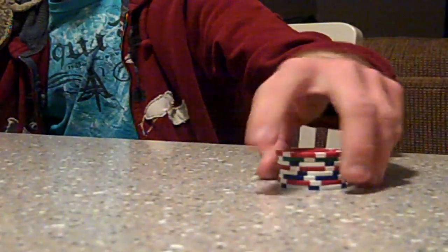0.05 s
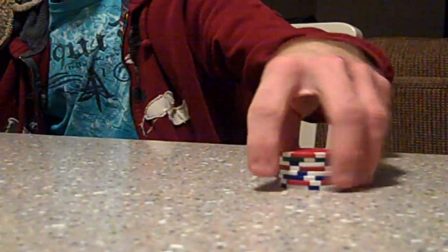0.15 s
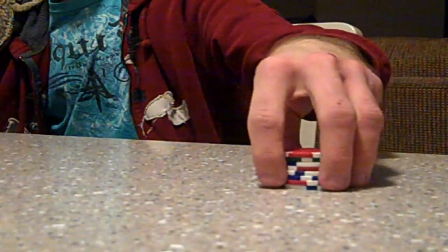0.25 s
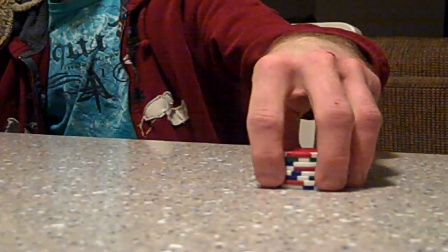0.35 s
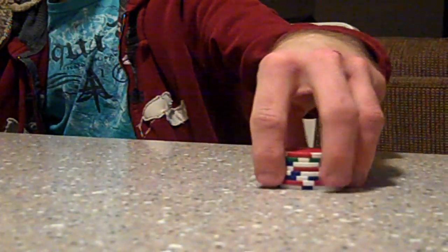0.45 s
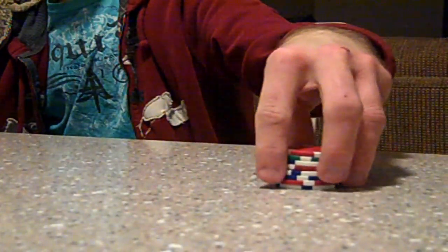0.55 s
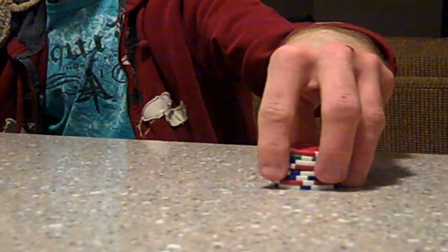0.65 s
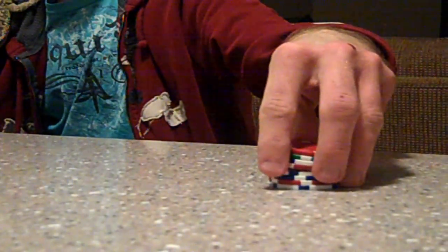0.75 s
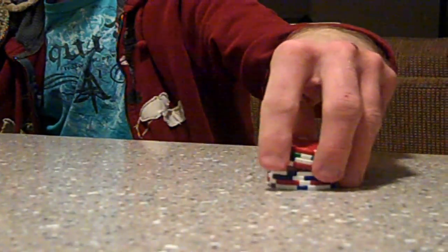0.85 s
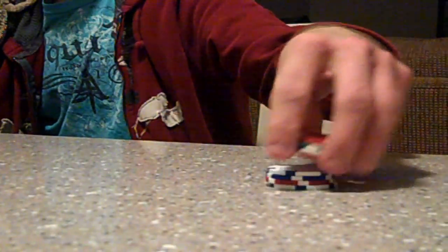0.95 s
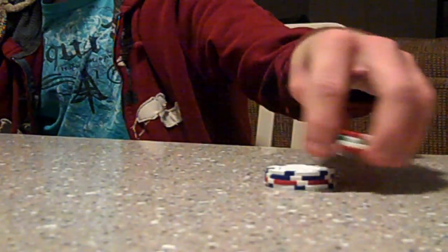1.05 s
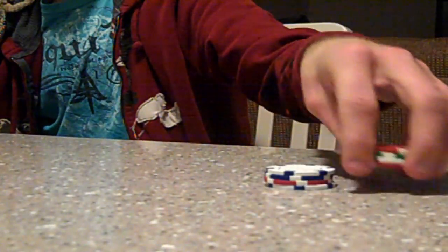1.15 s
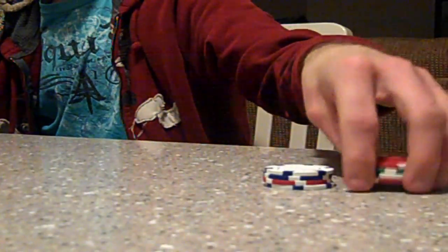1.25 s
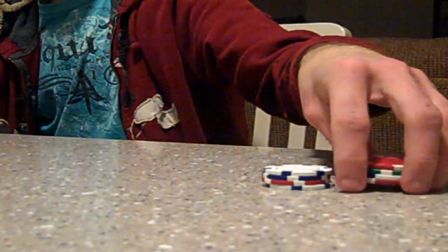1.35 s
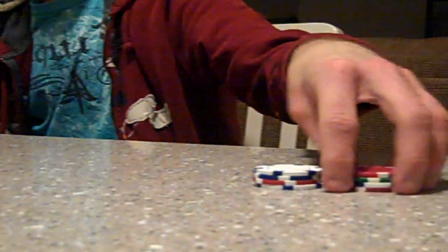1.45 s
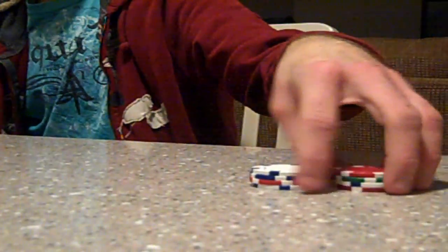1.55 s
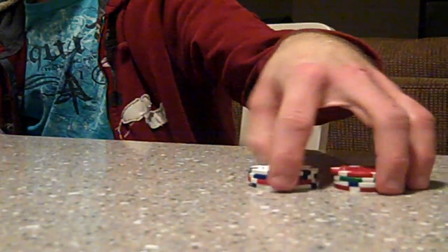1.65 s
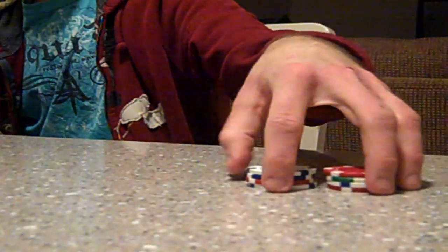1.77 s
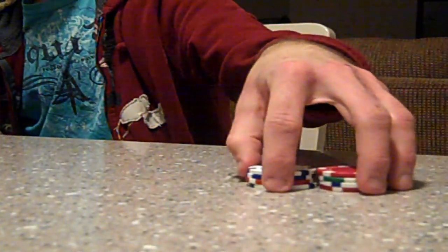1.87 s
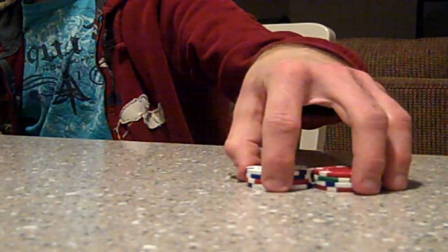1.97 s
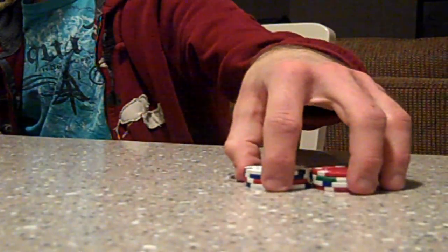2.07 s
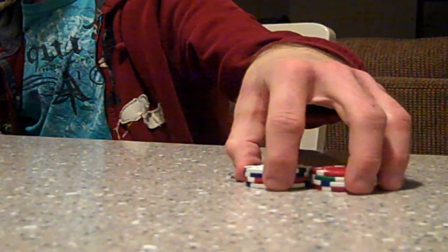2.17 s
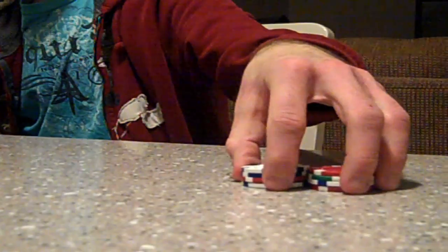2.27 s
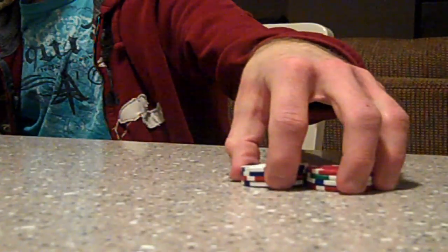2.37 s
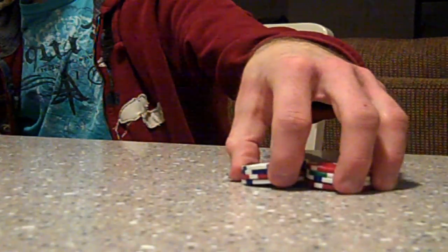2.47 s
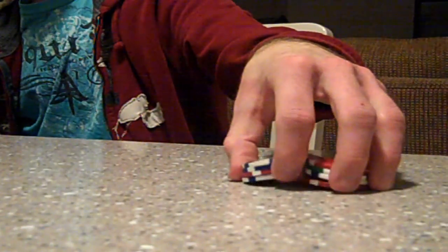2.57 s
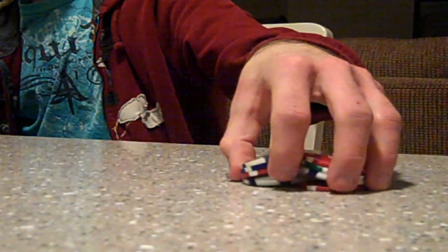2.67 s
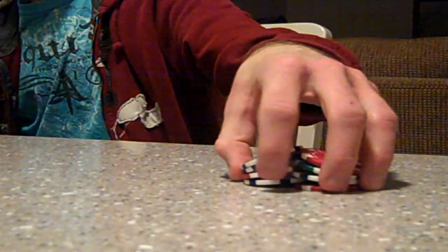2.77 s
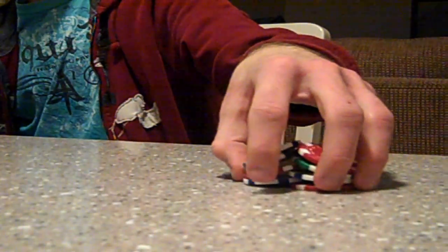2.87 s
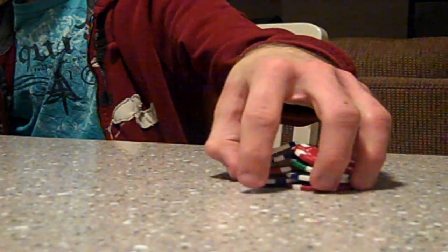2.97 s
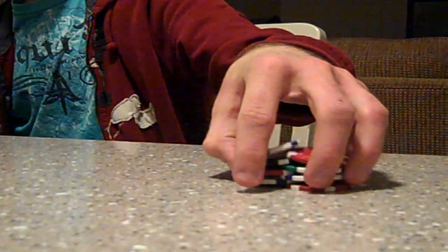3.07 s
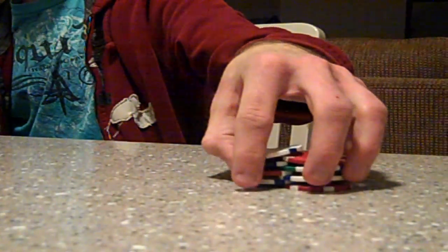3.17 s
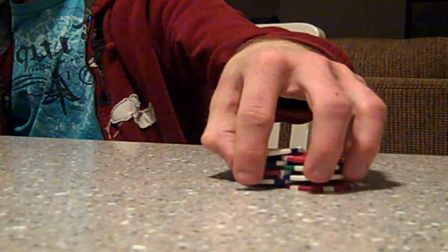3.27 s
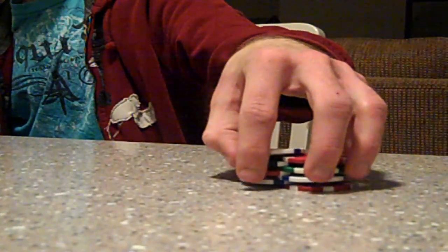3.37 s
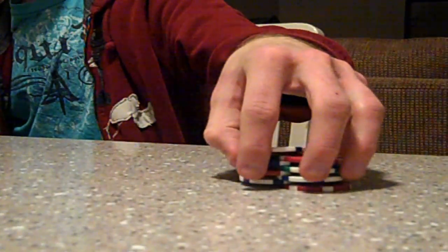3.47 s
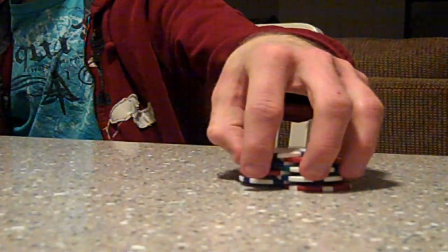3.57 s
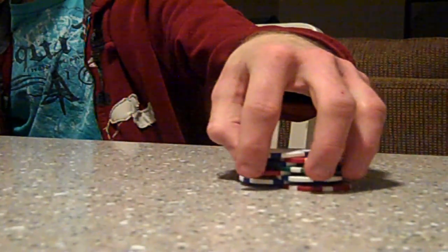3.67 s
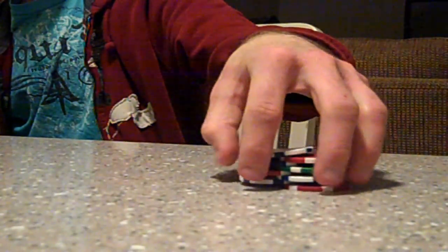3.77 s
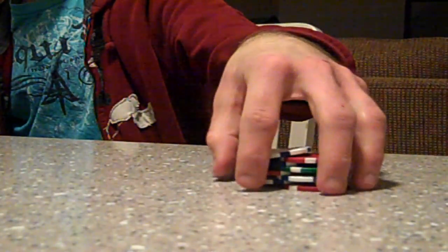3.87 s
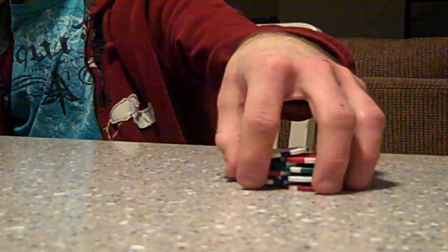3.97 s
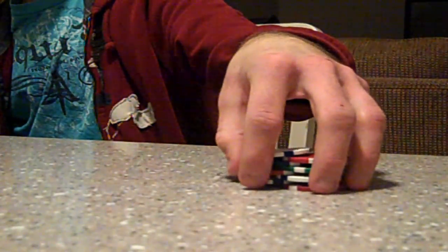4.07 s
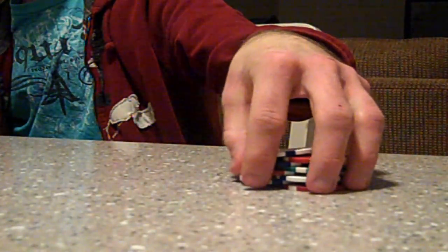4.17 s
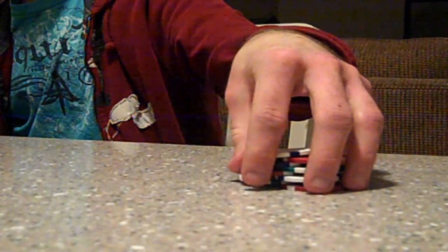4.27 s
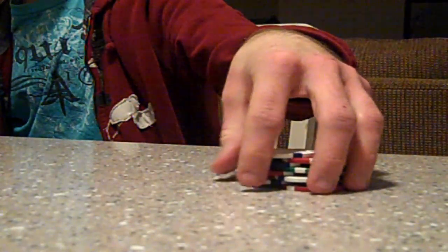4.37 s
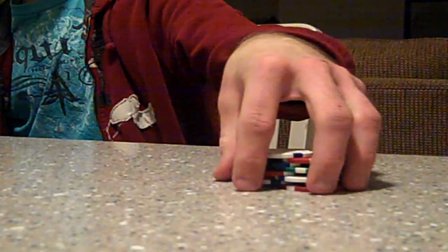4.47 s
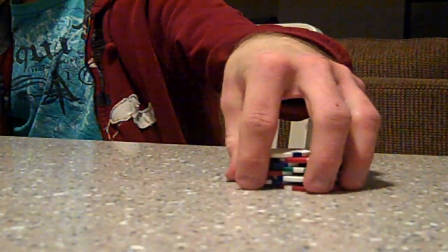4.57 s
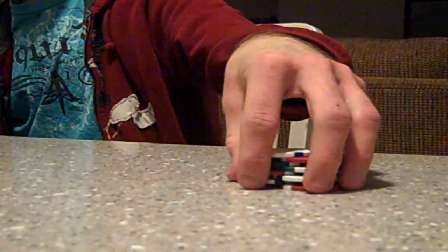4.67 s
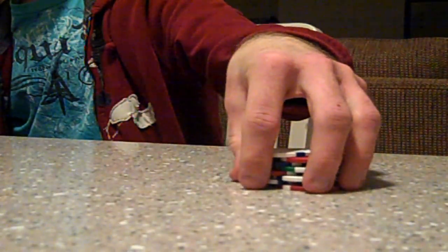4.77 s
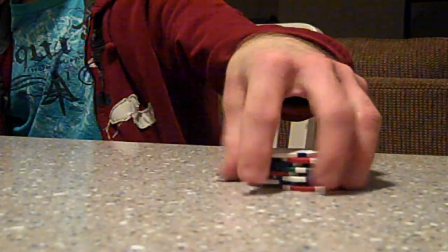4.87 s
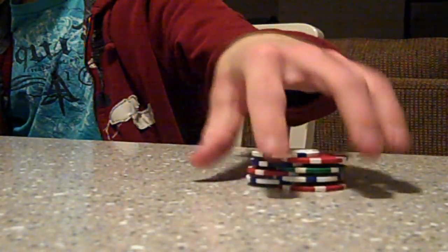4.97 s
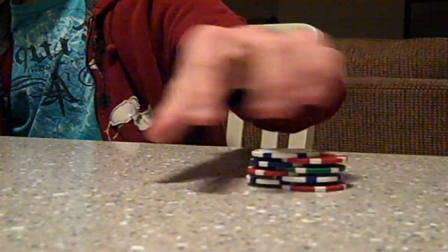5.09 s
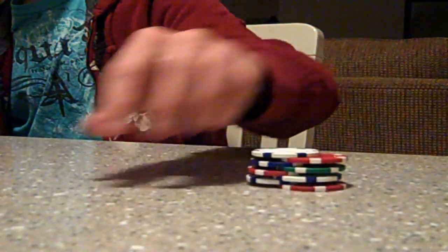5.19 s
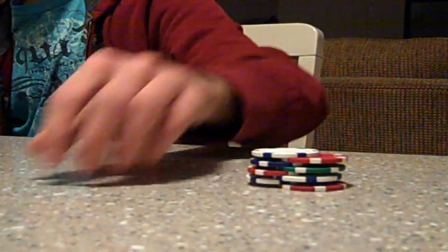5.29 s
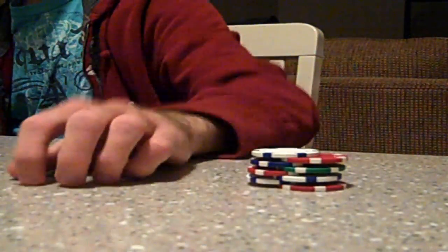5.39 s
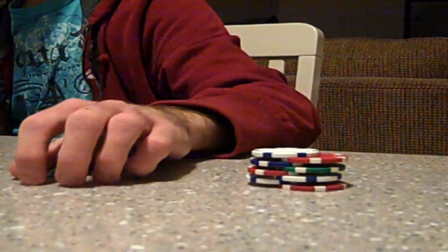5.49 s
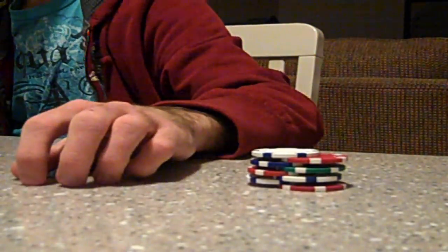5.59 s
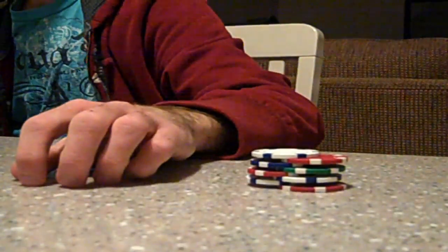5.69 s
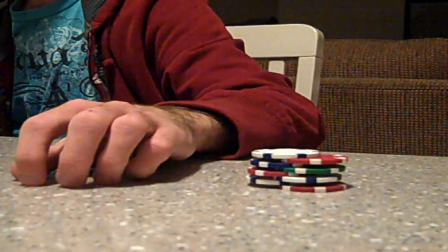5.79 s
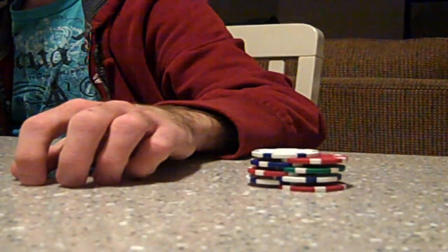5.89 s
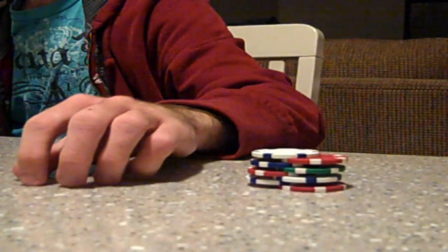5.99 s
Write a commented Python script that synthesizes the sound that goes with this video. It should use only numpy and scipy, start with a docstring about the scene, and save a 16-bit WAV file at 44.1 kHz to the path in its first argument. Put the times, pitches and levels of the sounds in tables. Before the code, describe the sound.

Poker chips rattle to rest, one half slaps loudly onto a hard table, then chips riffle together and a hand knocks dully.

```python
"""In a small room, at a table, a hand cuts a stack of plastic poker chips, sets one half down with
a loud slap and riffles the halves together; chips slide and the hand lands with a dull knock.
Each contact is a force exciting damped modes of tabletop, pressed stack, chip plates and table slab.
Dense, uneven early echoes and a diffuse tail follow, over steady low rumble and hiss.
The close microphone overloads on the hardest clacks."""
import sys
import numpy as np
from scipy import signal
from scipy.fft import rfft, irfft
from scipy.io import wavfile

SR = 44100
rng = np.random.default_rng(int(sys.argv[2]) if len(sys.argv) > 2 else 0)


def log_audio(samples):
    """Write samples as a 16-bit WAV file to the path given in sys.argv[1]."""
    # one column per channel
    frames = np.atleast_2d(samples).T
    # limit to full scale, then quantise
    limited = np.clip(frames, -1, 1)
    pcm = np.round(limited * 32767).astype(np.int16)
    wavfile.write(sys.argv[1], SR, pcm)


N = 266231
RING_TIME = np.arange(SR // 2) / SR  # s

# Mode tables give nominal tuning and relative level; pitch factors and random spread act on them.
# tabletop knocking under a chip: [f/Hz, level/dB, t60/s]
TABLETOP_MODES = [(490, -10, 0.094), (538.7, -10, 0.035), (626, 0, 0.086), (715, -2, 0.035),
                  (789, -9.5, 0.04), (1080, -7.5, 0.0068)]
# chips pressed together, damped by the fingers: [f/Hz, level/dB, t60/s]
STACK_MODES = [(1370, -9, 0.026), (1604, -2, 0.0067), (1847, 2, .02), (2000, 1.5, 0.017), (2420, -7, 0.012),
               (2760, -1, .013), (3150, -8, .007), (3380, -11, 0.0041)]
# plate modes of a held chip: [f/Hz, level/dB, t60/s]
CHIP_MODES = [(4430, -8.5, .01), (5236, -3, 0.0043), (5790, -0.5, 0.012), (6130, 2, 0.012),
              (6750, -7, .008), (8110, -2.5, .01), (8340, -7, 0.0045), (11020, -17.5, .01),
              (12000, -18, 0.0086)]
# a chip that is free to ring: [f/Hz, level/dB, t60/s]
LOOSE_CHIP_MODES = [(4420, -17, .06), (7265, 0, .06), (7570, -8, .03), (9900, -21, .04)]
# the table's slab giving under a chip: [f/Hz, level/dB, t60/s]
SLAB_MODES = [(108, -7, 0.068), (154, -4, .07), (192, 0, .08), (239.3, 0, 0.12), (288, 0, 0.18),
              (365, 1, 0.14), (450, -4, .06)]
# the whole table under a soft blow: [f/Hz, level/dB, t60/s]
TABLE_BODY_MODES = [(67.66, -17.5, .16), (99.3, -0.5, 0.21), (132, -7, 0.05), (179, -4, 0.17),
                    (237, -9.5, 0.11), (287, -8, 0.18), (354, -5.5, .15), (437, -12.5, .06),
                    (550, -16.5, 0.092), (632, -16, 0.09), (764, -14.5, 0.061), (960, -20.5, 0.046)]
# the whole stack rocking to rest on the table: [f/Hz, level/dB, t60/s]
ROCKING_MODES = [(136, 1, 0.08), (290, -6.5, 0.024), (596, 3.5, 0.016), (830, -2, 0.025), (890, -2, 0.053),
                 (1020, 1.5, 0.0063), (1770, -10, 0.023), (2170, -3, 0.0059), (4520, -8, 0.0049),
                 (6240, -5.5, 0.003), (7600, 0, 0.0096), (8350, -5.5, 0.0026)]

# chips falling on chips in the riffle:
# [t/s, stack level/dB, rim snap over that level/dB, pitch factor, chatter decay/s]
RIFFLE_CLACKS = [(2.733, -14.5, 1, .98, 0.0006), (2.7963, -15, 6, .97, 0.00073),
                 (2.7997, -29, 16, .88, .0012), (2.8269, -17.5, 2.5, 0.93, 0.0013),
                 (2.8326, -25.5, 5, 0.88, 0.0013), (3.109, -31.5, -17, 0.82, .003),
                 (3.1159, -28, -9, 0.93, .003), (3.146, -23, -10.5, 0.95, 0.0012),
                 (3.1648, -28, -7, 0.83, 0.0021), (3.176, -33.5, -6, 0.88, 0.0052),
                 (3.2161, -25.5, -10, .91, 0.00099), (3.4211, -33.5, -7.5, 1, 0.0018),
                 (3.429, -33.5, -11.5, 0.99, 0.0026), (3.671, -39.5, -3, 0.98, .003),
                 (3.687, -29, -11.5, 0.94, 0.0012), (3.7008, -31, 1.5, 0.98, 0.0033),
                 (3.8853, -40, -3, 1, 0.00063), (3.934, -45, -6, 1, 0.00096),
                 (4.949, -68.5, 12, 0.73, .001)]
# chips and fingers rubbing: [t/s, length/s, tabletop level/dB, rim scratch over that level/dB]
CHIP_SLIDES = [(2.24, .052, -55, 0), (2.444, 0.1, -61.5, -7), (2.655, .085, -50.5, -16.5),
               (2.946, 0.052, -44.5, -13), (3.114, 0.046, -35, -6.5), (3.547, 0.069, -52, -11.5),
               (3.674, .03, -35, -18), (4.615, 0.059, -59, -7), (4.762, 0.075, -59, -11),
               (4.869, 0.046, -62, -9), (5.811, 0.018, -60.5, 1.5)]
# blows of the hand on the table: [t/s, thud level/dB, knuckle tick level/dB]
HAND_KNOCKS = [(5.4471, -20.5, -36), (5.46, -33, -63.5), (5.5096, -39.5, -51)]
# fingers nudging the piles against the table: [t/s, tabletop level/dB]
FINGER_NUDGES = [(.291, -54), (.611, -56), (2.011, -49.5), (2.06, -48.5), (2.939, -32), (3.327, -43),
                 (3.381, -46), (3.485, -41.5), (3.568, -46.5), (3.791, -36.5), (4.224, -49.5), (4.322, -43),
                 (4.336, -42.5), (4.644, -55), (4.935, -52), (5.003, -52)]
# looseness of the fingers' hold: [t/s, level of the free ring over the snap/dB]
GRIP_LOOSENESS = [(1.55, -4), (2.72, -25), (2.85, -30), (3.12, -7), (3.22, -19), (3.43, -14), (3.68, 0),
                  (3.93, -8), (5.0, -12)]

# spectrum of the room's late answer: [f/Hz, gain/dB]
TAIL_COLOUR = [(100, -15.5), (300, -13.5), (600, -10.5), (900, -8.5), (1250, -14), (2000, -20.5),
               (3500, -18.5), (5000, -20), (7500, -18.5), (10000, -18.5), (15000, -30)]
# decay of the late answer: [f/Hz, t60/s]
TAIL_T60 = [(100, .45), (700, .62), (2000, .6), (5000, .53), (7300, .54), (10000, .4), (15000, .24)]
# spectral shape of the background: [f/Hz, relative level per Hz/dB]
FLOOR_COLOUR = [(25, -17), (55, -12), (90, -10), (140, -2), (230, -6), (400, -11), (650, -14),
                (1000, -16.5), (2000, -20), (5000, -25), (8000, -27.5), (14000, -31)]

# a clack of middling strength sets these levels (dB); knock and thump follow a share of its swing
MIDDLING_DB, KNOCK_DB, KNOCK_FOLLOWS, THUMP_DB, THUMP_FOLLOWS = -29.5, -33, 0.83, -36, 0.33
STACK_OCT_PER_DB = .012  # blows above middling press the stack tighter and raise its pitch
SLAP_S, SLAP_DB, SLAP_CHATTER_S, SLAP_PITCH = 1.513, -9.5, 0.0025, 1.02
BOUNCE_GAP_S, BOUNCE_SHRINK = .0108, .72  # first gap, factor from gap to gap
BOUNCE_LOSS_DB = 2  # per bounce
STACK_LOSS_DB = 1.5  # further loss of the pressed clack per bounce, as the pile loosens
PILE_LAG_S = .0018  # from a landing until the upper chips snap shut
RIM_TICK_S, RIM_TICK_DB, RIM_TICK_PITCH = 1.4506, -46.5, 1.4
FIDGET_S, FIDGET_COUNT, FIDGET_DB = (4.15, 4.85), 6, -54.5  # time span, touches, level
ROCKING_DB, ROCKING_DIES_S = -29, 0.041  # level, time constant of the chatter
FLOOR_DB, HISS_TOP_HZ = -57.3, 14300  # rms level and upper edge of the background
CUTOFF_HZ = 16000  # upper edge of the recorded sound
LEVEL_WINDOW_S = .01  # an event's energy is that of its level held this long


def slap(thump_db=-35, top_db=-17, snap_db=-2.5, pile_top_db=-13, pile_stack_db=-10,
         pile_snap_db=3, pile_loss_db=2.5, thud_db=-33, push_s=0.0016, count=5):
    """Repeated impact: the half stack thuds and bounces at shrinking gaps, its upper chips snapping shut."""
    out, s = np.zeros(N), SLAP_S
    push = RING_TIME * np.exp(-RING_TIME / push_s)
    add(out, s, ring(push, TABLE_BODY_MODES, spread_db=1.0, detune=.006), thud_db)
    for k in range(count):
        db = SLAP_DB - BOUNCE_LOSS_DB * k
        out += strike(s, db + thump_db, db + top_db, db - STACK_LOSS_DB * k, db + snap_db,
                      1, SLAP_PITCH, SLAP_CHATTER_S)
        pile_db = db - pile_loss_db * k
        out += strike(s + PILE_LAG_S, pile_db + thump_db, pile_db + pile_top_db,
                      pile_db + pile_stack_db, pile_db + pile_snap_db, 1, SLAP_PITCH, SLAP_CHATTER_S)
        s += BOUNCE_GAP_S * BOUNCE_SHRINK ** k
    return out


def clacks():
    """Common excitation: one strength sets each riffled chip's clack, tabletop knock and slab thump."""
    out = np.zeros(N)
    for s, db, snap_db, pitch, chatter_s in RIFFLE_CLACKS:
        over_db = db - MIDDLING_DB
        thump_db = THUMP_DB + THUMP_FOLLOWS * over_db
        knock_db = KNOCK_DB + KNOCK_FOLLOWS * over_db
        stack_pitch = 2 ** (STACK_OCT_PER_DB * max(over_db, 0))
        out += strike(s, thump_db, knock_db, db, db + snap_db, stack_pitch, pitch, chatter_s)
    return out


def strike(s, thump_db, top_db, stack_db, chip_db, stack_pitch, pitch, chatter_s,
           touch_share=1.1, hard_db=-18):
    """Impulsive contact: a chip's rim gives one sharp touch, then decaying chatter excites the modes."""
    out, t = np.zeros(N), RING_TIME[:SR // 6]
    chatter = grains(len(t), uneven_db=0.5) * np.exp(-t / max(chatter_s, 1e-4))
    force = unit_energy(chatter)
    force[0] = touch_share
    hardness = min(1, from_db(chip_db - hard_db))
    parts = chip_parts(force, stack_pitch, pitch, crack_db=-3.5, hardness=hardness)
    for part, db in zip(parts, (top_db, stack_db, chip_db)):
        add(out, s, part, db)
    thump = band(ring(force, SLAB_MODES, spread_db=4, detune=0.036), 85, 780)
    add(out, s, thump, thump_db)
    loose_db = np.interp(s, *np.transpose(GRIP_LOOSENESS))
    add(out, s, ring(force, LOOSE_CHIP_MODES, spread_db=3.5, detune=.005), chip_db + loose_db)
    return out


def chip_parts(force, stack_pitch, pitch, crack_db, hardness, soft_hz=2300, hard_hz=7000):
    """Modal density: discrete modes plus a noise band for dense, damped ones; harder blows reach higher."""
    crack = from_db(crack_db)
    top = ring(force, TABLETOP_MODES, spread_db=3.5, detune=0.012)
    top = top + crack * unit_energy(band(force, 520, 1300))
    stack = ring(force, STACK_MODES, stack_pitch, spread_db=2, detune=0.029)
    stack = stack + crack * unit_energy(band(force, 1600, 5500))
    chip = ring(force, CHIP_MODES, pitch, spread_db=3.5, detune=0.019)
    chip = chip + crack * unit_energy(band(force, 4800 * pitch, 8500 * pitch))
    stack_top_hz = soft_hz + (hard_hz - soft_hz) * hardness
    chip_top_hz = 9000 * pitch * (1 + hardness)
    return dull(top, 1600), dull(stack, stack_top_hz), dull(chip, chip_top_hz)


def knocks(contact_s=0.00073, tick_s=0.0016):
    """Contact time: the knuckle's tick is short noise, while a soft push wakes the table's low modes."""
    out = np.zeros(N)
    push = RING_TIME * np.exp(-RING_TIME / contact_s)
    for s, thud_db, tick_db in HAND_KNOCKS:
        add(out, s, ring(push, TABLE_BODY_MODES, spread_db=2.0, detune=0.0071), thud_db)
        tick = grains(len(RING_TIME), uneven_db=3) * np.exp(-RING_TIME / tick_s)
        add(out, s, band(tick, 500, 2560) + .5 * band(tick, 4200, 7700), tick_db)
    return out


def slides(rumble_db=-6, stack_db=-2):
    """Friction as dense micro-impacts: textured faces rub in a swell that also rumbles the slab."""
    out = np.zeros(N)
    for s, length_s, db, scratch_db in CHIP_SLIDES:
        stroke = np.sin(np.pi * np.clip(RING_TIME / length_s, 0, 1))
        force = grains(len(stroke), uneven_db=7.0) * stroke
        parts = chip_parts(force, 0.94, 0.93, crack_db=-2.5, hardness=0)
        for part, part_db in zip(parts, (0, stack_db, scratch_db)):
            add(out, s, part, db + part_db, length_s)
        rumble = band(ring(force, SLAB_MODES, spread_db=3, detune=.05), 130, 600)
        add(out, s, rumble, db + rumble_db, length_s)
    return out


def rocking():
    """Decaying chatter: the stack, just set down, rocks to rest and excites its modes ever less."""
    out = np.zeros(N)
    force = grains(len(RING_TIME), uneven_db=4.5) * np.exp(-RING_TIME / ROCKING_DIES_S)
    add(out, 0, dull(ring(force, ROCKING_MODES, spread_db=1.0, detune=0.0054), 9700), ROCKING_DB)
    return out


def nudges(thump_db=-1.5, stack_db=-8.5, snap_db=-22, stack_pitch=.97, pitch=0.89, chatter_s=.0022):
    """Soft excitation: pushes mostly heard through the table, with faint random touches of squaring up."""
    out = np.zeros(N)
    fidgets = [(rng.uniform(*FIDGET_S), FIDGET_DB) for _ in range(FIDGET_COUNT)]
    for s, db in [*FINGER_NUDGES, *fidgets]:
        out += strike(s, db + thump_db, db, db + stack_db, db + snap_db, stack_pitch, pitch, chatter_s)
    return out


def rim_tick(chatter_s=.0008):
    """Isolated plate: two rims tick as the cut half is lowered; off the table only the chip sounds."""
    out = np.zeros(N)
    force = grains(len(RING_TIME), uneven_db=0.5) * np.exp(-RING_TIME / chatter_s)
    tick = ring(force, CHIP_MODES, RIM_TICK_PITCH, spread_db=3)
    tick = tick + unit_energy(band(force, 6500, 14000))
    add(out, RIM_TICK_S, tick, RIM_TICK_DB)
    return out


def room(x, early_db=-13, early_t60=0.21, first_echo_s=0.002, build_s=.012):
    """Reverberation: uneven echoes from hand, body and table, and a diffuse tail that dies band by band."""
    t = np.arange(int(.8 * SR)) / SR
    edges = np.geomspace(70, 17000, 17)
    white, tail = rng.standard_normal((2, len(t))), 0
    for k, (low, high) in enumerate(zip(edges, edges[1:])):
        hz = np.sqrt(low * high)
        decay = np.exp(-np.log(1000) * t / at_hz(TAIL_T60, hz))
        fade = unit_energy(decay * (1 - np.exp(-t / build_s)))
        # neighbouring bands take turns between two independent noises
        tail = tail + from_db(at_hz(TAIL_COLOUR, hz)) * band(white[k % 2], low, high) * fade
    echoes = grains(len(t), uneven_db=8.5) * (t > first_echo_s)
    echoes = echoes * np.exp(-np.log(1000) * t / early_t60)
    early = from_db(early_db) * band(unit_energy(echoes), 90, 8100)
    return signal.fftconvolve(x, tail + early)[:N]


def background():
    """Stationary coloured noise: a spectral weighting of white noise gives low room rumble and hiss."""
    hz = np.maximum(np.arange(N // 2 + 1) * SR / N, 1)
    colour = from_db(at_hz(FLOOR_COLOUR, hz)) * (hz < HISS_TOP_HZ)
    noise = irfft(rfft(rng.standard_normal(N)) * colour, N)
    return from_db(FLOOR_DB) * np.sqrt(N) * unit_energy(noise)


def ring(force, modes, pitch=1, spread_db=5.5, detune=.015):
    """Modal superposition: a force drives damped resonators; grip and contact point vary level and tuning."""
    out = 0
    variations = rng.standard_normal((len(modes), 2))
    for k, ((hz, db, t60), (louder, sharper)) in enumerate(zip(modes, variations)):
        r = from_db(-60 / (t60 * SR))  # pole radius: 60 dB lost in t60
        w = 2 * np.pi * hz * pitch * (1 + detune * sharper) / SR
        tone = signal.lfilter([1, 0, -1], [1, -2 * r * np.cos(w), r * r], force + 1e-18)
        out = out + (-1) ** k * from_db(db + spread_db * louder) * unit_energy(tone)
    return unit_energy(out)


def grains(size, uneven_db):
    """Random excitation: tiny touches of uneven strength."""
    return rng.standard_normal(size) * from_db(uneven_db * rng.standard_normal(size))


def band(x, low_hz, high_hz):
    """Band-pass filtering: keep what lies between two frequencies."""
    edges = [low_hz, min(high_hz, .45 * SR)]
    return signal.sosfilt(signal.butter(2, edges, "band", fs=SR, output="sos"), x)


def dull(x, top_hz):
    """Low-pass filtering: weaken what lies above a frequency."""
    return signal.sosfilt(signal.butter(2, min(top_hz, .45 * SR), fs=SR, output="sos"), x)


def at_hz(points, hz):
    """Interpolation of a spectrum on a log-frequency axis."""
    known_hz, values = np.transpose(points)
    return np.interp(np.log(hz), np.log(known_hz), values)


def from_db(db):
    """Logarithmic level: decibels to amplitude ratio."""
    return 10 ** (np.asarray(db) / 20)


def unit_energy(x):
    """Energy normalization: scale the sum of squares to one."""
    return x / np.sqrt(np.sum(x ** 2) + 1e-20)


def add(track, s, sound, db, over_s=LEVEL_WINDOW_S):
    """Superposition: mix in a sound whose energy equals an rms level of db held for over_s."""
    start = max(0, int(s * SR))
    gain = from_db(db) * np.sqrt(abs(over_s) * SR)
    part = (gain * unit_energy(sound))[:max(0, N - start)]
    track[start:start + len(part)] += part


def scene():
    """Linear superposition: chips and hand close by, their room response and the background."""
    direct = rocking() + rim_tick() + slap() + clacks() + nudges() + slides() + knocks()
    return (direct + room(direct) + background())[None]


def record(dry):
    """Overload and band limit: peaks clip at full scale, then a steep low-pass cuts the top."""
    clipped = np.clip(dry, -1, 1)
    return signal.sosfilt(signal.ellip(8, .1, 60, CUTOFF_HZ, fs=SR, output="sos"), clipped)


dry = scene()
out = record(dry)
log_audio(out)
```